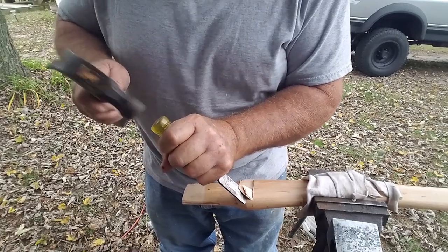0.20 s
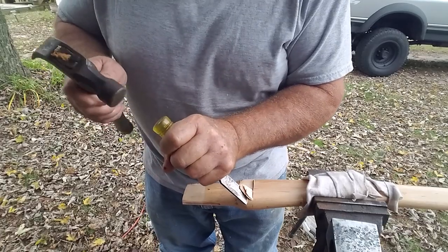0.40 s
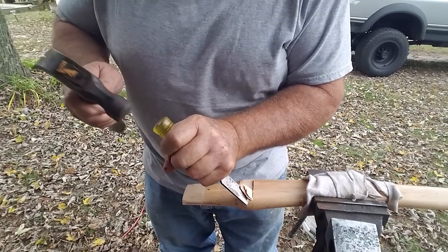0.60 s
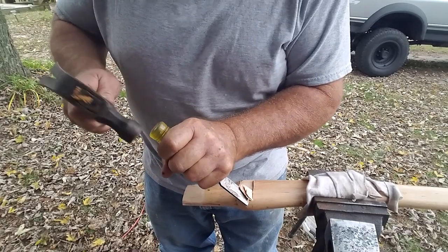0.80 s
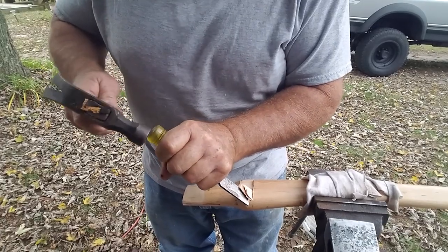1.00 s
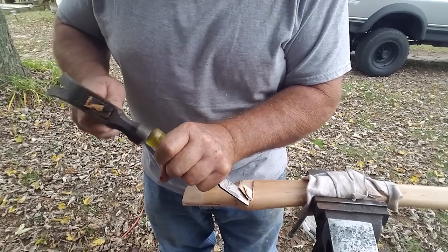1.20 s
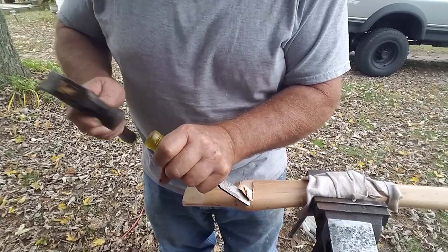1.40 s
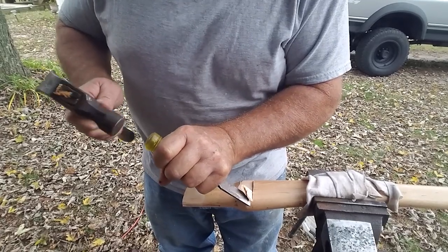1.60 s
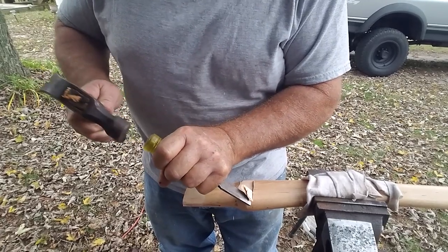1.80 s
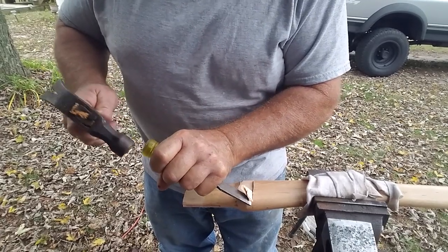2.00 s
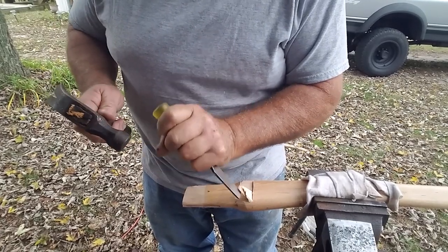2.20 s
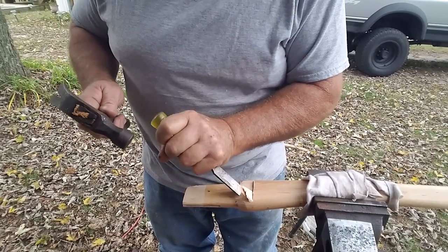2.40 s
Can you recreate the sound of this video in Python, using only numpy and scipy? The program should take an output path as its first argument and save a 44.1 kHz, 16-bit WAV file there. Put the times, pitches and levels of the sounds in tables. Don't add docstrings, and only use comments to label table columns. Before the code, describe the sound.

Hammer blows on a chisel in clamped wood, close and loud outdoors: eight sharp woody cracks from 0.22 to 1.87 seconds, roughly every 0.24. Each has a low thump, bench boom and brief steel ring, then about 0.03 later a loose vise clank with chatter. Small rattles settle between. One light chisel tap on wood at 2.32. Faint cricket chirps, quiet air and distant traffic rumble.

```python
import sys
import numpy as np
from scipy import signal
from scipy.fft import rfft, irfft, next_fast_len
from scipy.io import wavfile
from scipy.ndimage import map_coordinates

SR = 44100
rng = np.random.default_rng(int(sys.argv[2]) if len(sys.argv) > 2 else 0)


def gain_from_decibels(decibels):
    exponent = np.asarray(decibels, float) / 20
    return 10 ** exponent


def generate_wav(signal):
    frames = np.transpose(np.atleast_2d(signal))
    scaled = np.clip(frames, -1, 1) * 32767
    pcm = np.round(scaled).astype(np.int16)
    wavfile.write(sys.argv[1], SR, pcm)


N = 110250
PAD = 4410
T = np.arange(SR // 2) / SR

# start_s, peak_db, thump_db, thump_delay_s, boom_db
BLOWS = [
    (.22, -8.5, -10.5, .0135, -3.5),
    (0.4744, -7, -7.5, .012, 4.5),
    (0.7097, -5.5, -7, 0.011, 3.5),
    (0.9492, -7.5, -8, 0.01122, 0.5),
    (1.1994, -8.5, -8, .011, 0.5),
    (1.43, -8, -9.5, 0.01065, 1),
    (1.6588, -9, -12, .011, 2),
    (1.871, -8.5, -6.5, .012, 3),
]
# thump_hz, low_wood_db, knock_db, grain_db, steel_db
BLOW_COLOURS = [(275, -21.5, -11.5, -12.5, -37), (271.5, -19.5, -7, -16.5, -14), (247, -20, -3, -14.5, -28),
                (260, -25, -5, -13.5, -27.5), (260, -30, -6, -15.5, -16.5), (251.5, -20.5, -5, -13, -23),
                (270, -15, -5, -12, -17), (265.5, -16, -8, -11, -16)]
STEEL_LEVELS = [(-51, -56.5, -48, -63), (-41.5, -39.5, -70, -57), (-34, -33.5, -37, -41.5),
                (-47.5, -33, -35, -38.5), (-40, -41.5, -45, -69), (-37, -47, -37, -60.5),
                (-35, -48, -43, -67), (-30, -61, -48.5, -66)]
STEEL_HZ = [3491, 6850, 9003, 11350]
# t60_s, delay_s, attack_s
STEEL_ENVELOPES = [(0.38, 0.0085, 0.025), (0.11, .029, .002), (0.13, 0.0062, 0.0034), (0.16, 0.031, .002)]
# start_s, peak_db, clang_db, bright_db, wood_db
CLANKS = [
    (0.2452, -8.5, -18, -21.5, -10),
    (0.5029, -7, -12.5, -20, -9),
    (0.7413, -6.5, -15, -10.5, -8),
    (0.9777, -10, -14.5, -13.5, -10),
    (1.2259, -12.5, -17.5, -23, -13),
    (1.4566, -9, -17.5, -21, -15),
    (1.687, -9, -17, -21.5, -11),
    (1.899, -7.5, -14, -24, -13),
]
# start_s, peak_db, clang_db, bright_db, wood_db
EARLIER_CLANK = [
    (-.008, -11.5, -25, -29, -10),
]
# start_s, level_db
RATTLES = [
    (0.065, -39),
    (.575, -35),
    (0.819, -38),
    (1.063, -31),
    (1.523, -39),
    (1.75, -34),
    (1.965, -36.5),
]
# start_s, level_db, pitch_hz, hold_s
CHATTER = [(.245, -22.5, 2430, 0.013), (.262, -30.5, 2433, 0.011), (.5035, -14, 2406, 0.0087),
           (.511, -18, 2388, 0.027), (.526, -19, 2408, 0.0074), (.7415, -27, 2370, 0.0094),
           (.75, -18, 2388, .013), (.766, -14.5, 2443, 0.006), (.776, -25, 2436, 0.0056),
           (.979, -12.5, 2398, 0.027), (1.0, -28, 2390, 0.011), (1.0677, -41.5, 2395, 0.019),
           (1.2275, -16, 2425, 0.014), (1.4575, -19, 2417, .016), (1.681, -25, 2580, .004),
           (1.687, -17, 2400, 0.015), (1.8985, -14.5, 2444, 0.011), (1.912, -28.5, 2464, 0.0091),
           (-.01, -26, 2473, 0.023)]
# start_s, level_db
SNAPS = [(0.2444, -24), (0.252, -22.5), (0.502, -13), (0.7394, -13.5), (0.752, -14), (0.9785, -18),
         (0.985, -18), (1.2268, -21), (1.4588, -18.5), (1.6846, -15), (1.694, -21), (1.8997, -19),
         (1.905, -23)]
# start_s, level_db, pitch_hz, hold_s
SWINGS = [(0.245, -13.5, 285, 0.027), (0.501, -16.5, 240.5, 0.024), (0.514, -16, 260, 0.013),
          (0.739, -12.5, 270, 0.017), (.972, -24, 270, .008), (0.995, -20, 260, 0.01),
          (1.225, -13.5, 270, .012), (1.46, -14.5, 275, 0.015), (1.684, -12, 270, 0.0075),
          (1.902, -13.5, 280.7, 0.031), (1.074, -25.5, 290, 0.015)]
# start_s, crack_db, ring_db, thud_db, thud_tuning (ratio)
TAPS = [
    (2.3241, -31, -18.5, -24, 1.001),
]
# start_s, length_s, level_db, pitch_hz
CHIRPS = [
    (0.111, 0.026, -53.5, 4130),
    (.172, 0.028, -49, 4170),
    (0.642, .015, -57.5, 5640),
    (0.657, .02, -57, 5260),
    (0.871, 0.03, -56, 4180),
    (0.931, .015, -56.5, 4110),
    (1.709, .025, -48, 4190),
    (2.38, 0.018, -71.5, 3910),
    (2.432, 0.024, -52, 4170),
    (2.49, 0.013, -52.5, 4200),
]

# pitch_hz, density_db
CRACK = [(180, -38), (300, -3.5), (1040, -6), (2280, 8.5), (4850, -7), (6780, -7), (9180, -18),
         (13700, -17), (16500, -30)]
# pitch_hz, density_db
CLATTER = [(180, -16), (300, -9), (638, -12), (938, -15.5), (1230, -13), (5020, -35.5), (9020, -50),
           (15400, -59), (16500, -62)]
# pitch_hz, density_db
SCATTER = [(24, -42), (40, -19), (101, 2), (701, -24.5), (1540, -33), (3310, -38.5), (3550, -40.5),
           (3820, -38), (12000, -96), (15600, -56), (22000, -120)]

HANDLE = [(734.6, -14.5, 0.082), (895.7, -5.5, 0.082), (1510, -11.5, 0.032), (2540, -17, 0.015),
          (3863, 11, 0.0045), (5830, -5.5, 0.0088)]
# pitch_hz, level_db, t60_s
LOW_WOOD = [(456.5, 0.6, 0.097), (533.6, 0, 0.075)]
# pitch_hz, level_db, t60_s
GRAIN = [(1960, 5.6, 0.018), (1469, -9, 0.032), (3058, -9, .03)]
# pitch_hz, level_db, t60_s
KNOCK = [(1026.4, 1.5, .026)]
# pitch_hz, level_db, t60_s
TANG = [(14220, -35.5, .08), (15150, -36.5, .1)]
# pitch_hz, level_db, t60_s
BENCH = [(72.83, -29.5, 0.67), (105.9, -20, 0.35), (180.4, -21.5, 0.24), (281.5, -11.5, 0.12),
         (343.4, -15.5, 0.12)]
# pitch_hz, level_db, t60_s
CLANG = [(2635, -2.5, 0.051), (2717, -10, 0.046), (3140, -16, 0.11), (1617, -3, 0.03), (1492, -6, 0.063),
         (1249, -31, 0.0583), (1900, -17.5, 0.051), (1022, -8.5, 0.064)]
# pitch_hz, level_db, t60_s
BRIGHT_STEEL = [(6250, -34, 0.24), (8030, -23.5, 0.084), (9787, -32.5, 0.089), (12450, -43.5, .07)]
# pitch_hz, level_db, t60_s
SNAP = [(2870, 2.5, 0.014), (3930, -12, 0.011), (1584, -5, 0.026), (6330, -20.5, 0.011),
        (5500, -14.5, 0.023)]
# pitch_hz, level_db, t60_s
TAPPED = [(863, -12, 0.085), (1072, 9.5, 0.033), (1200, -21, 0.07), (1560, 4, 0.0153), (546, -0.5, .03),
          (2400, -13, 0.027), (2590, -4.5, 0.019), (2890, -5, 0.014), (3850, -8.5, 0.012)]
# pitch_hz, level_db, t60_s
THUD = [(183, -6, 0.18), (281.4, 6.5, 0.085), (312, 1, 0.19), (482, -4.5, 0.069), (750, -12.5, 0.12)]

# pitch_hz, density_db
YARD = [(22, -4.5), (110, 0), (400, -10.5), (1500, -25), (6300, -37), (6900, -39.5), (10000, -45),
        (13500, -38)]
# start_s, level_db
SWELL = [(0, 7), (.2, -7), (1.15, -6), (2.101, 2), (2.5, -1)]
# pitch_hz, width_hz, level_db
INSECTS = [(2736, 460, -71), (5860, 590, -73)]
# pitch_hz, likeness (0 to 1)
AIR_LIKENESS = [(60, .95), (300, .92), (1000, .4), (4000, .2)]
# pitch_hz, left_over_right_db
BALANCE = [(60, 2.4), (300, 2.6), (700, .5), (1400, 1.5), (2800, 2), (5600, -3), (14000, -9)]
# pitch_hz, left_lead_rad
LEFT_LEAD = [(250, 0), (700, .45), (1400, .7), (2800, 1.4), (9000, 1.6)]


def unit(x):
    return x / np.sqrt(np.mean(x ** 2) + 1e-20)


def along(points, hz):
    f, v = np.transpose(points)
    return np.interp(np.log(hz + 1), np.log(f + 1), v)


def filtered(x, response):
    m = next_fast_len(x.shape[-1] + 8192)
    spectrum = rfft(x, m) * response(np.fft.rfftfreq(m, 1 / SR))
    return irfft(spectrum, m)[..., :x.shape[-1]]


def hiss(spectrum, likeness, size):
    def split(hz):
        angle = np.arccos(np.clip(along(likeness, hz), -1, 1)) / 2
        return gain_from_decibels(along(spectrum, hz)) * [np.cos(angle), np.sin(angle)]

    shared, opposed = filtered(rng.standard_normal((2, size)), split)
    return unit(np.array([shared + opposed, shared - opposed]))


def wander(points, rate_hz, t=T):
    return map_coordinates(rng.standard_normal(points), [t * rate_hz])


def fade(t60_s, attack_s):
    return gain_from_decibels(-60 * T / t60_s) * (1 - np.exp(-T / attack_s))


def ring(modes, attack_s):
    hz, db, t60_s = np.transpose(modes)[:, :, None]
    luck = rng.standard_normal((3, len(modes), 1))
    level = gain_from_decibels(db + 1.5 * luck[0])
    phase = 2 * np.pi * hz * (1 + .005 * luck[1]) * T + .4 * luck[2]
    return (level * fade(t60_s, attack_s) * np.sin(phase)).sum(0)


def held(hz, hold_s, t60_s, attack_s):
    return fade(t60_s, attack_s) * np.sin(2 * np.pi * hz * T) / (1 + (T / hold_s) ** 3)


def burst(spectrum, treble_likeness, t60_s, attack_s, rough_db, rate_hz):
    lumps = wander(400, rate_hz)
    noise = hiss(spectrum, [(80, 1.0), (400, 0.71), (3000, treble_likeness)], size=len(T))
    return noise * fade(t60_s, attack_s) * gain_from_decibels(rough_db * lumps)


def silence():
    return np.zeros((2, PAD + N + SR))


def add(out, start_s, x):
    out[:, PAD + round(start_s * SR):][:, :len(T)] += x


def chatter():
    out = silence()
    for start_s, db, hz, hold_s in CHATTER:
        add(out, start_s, gain_from_decibels(db + 1.0) * held(hz, hold_s, 0.13, 0.0028))
    return out


def clanks():
    out = silence()
    for start_s, db, clang_db, bright_db, wood_db in list(CLANKS) + list(EARLIER_CLANK):
        add(out, start_s, gain_from_decibels(db - 9.5) * burst(CLATTER, 0.3, 0.079, 0.0002, 3.7, 433.5))
        add(out, start_s, gain_from_decibels(clang_db) * ring(CLANG, 0.0036))
        add(out, start_s, gain_from_decibels(bright_db) * ring(BRIGHT_STEEL, 0.0012))
        wood = ring(HANDLE[:3], 0.0025) + 0.24 * ring(LOW_WOOD, 0.0073)
        upper_bench = gain_from_decibels(2.0) * ring(BENCH[2:], 0.0044)
        add(out, start_s, gain_from_decibels(wood_db) * (wood + upper_bench))
    return out


def yard():
    t = np.arange(N) / SR
    air = gain_from_decibels(-50) * hiss(YARD, AIR_LIKENESS, size=N)
    rumble = filtered(air, lambda hz: 1 / (1 + (hz / 900) ** 2))
    swell_db = np.interp(t, *np.transpose(SWELL)) + 0.5 * wander(200, 6.86, t)
    out = air + rumble * (gain_from_decibels(swell_db) - 1)
    for hz, width_hz, db in INSECTS:
        band = [(hz - width_hz, -18), (hz, 0), (hz + width_hz * 0.29, -30), (20000, -90)]
        out = out + gain_from_decibels(db + 3.5 * wander(200, 25, t)) * hiss(band, [(100, 0.13)], size=N)
    return filtered(out, lambda hz: hz < 15800)


def rattles():
    out = silence()
    for start_s, db in RATTLES:
        rub = burst(CLATTER, 0.37, 0.07, 0.0105, 2.9, 225)
        add(out, start_s, gain_from_decibels(db) * (rub + 0.18 * ring(CLANG, 0.0043)))
    return out


def crickets():
    out = silence()
    pulse_s = .0165
    side_db = np.array([[5], [-.7]])
    strokes = np.abs(np.sin(np.pi * T / pulse_s / (1 + .3 * np.exp(-T / pulse_s)))) ** .7
    for start_s, length_s, db, hz in CHIRPS:
        tail = .3 * gain_from_decibels(-60 * (T - length_s) / 0.0812)
        shape = np.clip(T / 0.0028, 0, 1) * np.where(T < length_s, 1 - .5 * T / length_s, tail)
        waver = np.cumsum(wander(100, 120)) / SR
        tone = np.sin(2 * np.pi * hz * (T - 0.21 * T * T + .008 * waver))
        add(out, start_s, gain_from_decibels(db + side_db) * shape * strokes * tone)
    return out


def blows():
    out = silence()
    face = burst(CRACK, 0.31, 0.014, 0.003, 1.62, 430)
    for (start_s, db, thump_db, thump_delay_s, boom_db), colour in zip(BLOWS, BLOW_COLOURS):
        thump_hz, low_wood_db, knock_db, grain_db, steel_db = colour
        crack = gain_from_decibels(-5.0) * burst(CRACK, 0.52, 0.043, 0.00078, 2.4, 540)
        clatter = gain_from_decibels(-2.0) * burst(CLATTER, 0.26, 0.094, 0.0098, 1.1, 300)
        add(out, start_s - .0008, gain_from_decibels(db) * (gain_from_decibels(1.0) * face + crack + clatter))
        add(out, start_s, gain_from_decibels(db - 17) * burst(CRACK, 0.16, .1, .007, 4.4, 600))
        add(out, start_s, gain_from_decibels(db + 3.5) * ring(HANDLE, 0.0019))
        add(out, start_s, gain_from_decibels(low_wood_db) * ring(LOW_WOOD, 0.00307))
        add(out, start_s, gain_from_decibels(grain_db) * ring(GRAIN, 0.00086))
        add(out, start_s + .005, gain_from_decibels(steel_db) * held(2480, .01, 0.1, 0.0021))
        knock = gain_from_decibels(knock_db + 1.5) * ring(KNOCK, 0.00193)
        add(out, start_s + 0.001397, knock + gain_from_decibels(db) * ring(TANG, .003))
        add(out, start_s + thump_delay_s, -gain_from_decibels(thump_db + 10.0) * held(thump_hz, 0.0085, 0.098, 0.0031))
        add(out, start_s + 0.01609, gain_from_decibels(boom_db) * ring(BENCH, 0.0083))
        add(out, start_s, gain_from_decibels(db - 11.0) * burst(SCATTER, 0.253, 0.35, .02, 0.41, 90))
    return out


def steel_rings():
    out = silence()
    for blow, levels in zip(BLOWS, STEEL_LEVELS):
        for hz, db, (t60_s, delay_s, attack_s) in zip(STEEL_HZ, levels, STEEL_ENVELOPES):
            flutter_db = 2.1 * (hz > STEEL_HZ[0]) * wander(400, hz / 70)
            tone = fade(t60_s, attack_s) * np.sin(2 * np.pi * hz * T)
            add(out, blow[0] + delay_s, gain_from_decibels(db + flutter_db) * tone)
    return out


def snaps():
    out = silence()
    for start_s, db in SNAPS:
        add(out, start_s, gain_from_decibels(db) * ring(SNAP, .0003))
    return out


def swings():
    out = silence()
    for start_s, db, hz, hold_s in SWINGS:
        add(out, start_s, gain_from_decibels(db + 4.0) * held(hz, hold_s, 0.19, 0.0019))
    return out


def taps():
    out = silence()
    for start_s, crack_db, ring_db, thud_db, tuning in TAPS:
        crack = burst(CRACK, 0.8, 0.0078, 0.00066, 1.4, 300)
        clatter = .6 * burst(CLATTER, 0.55, 0.11, 0.0023, 2.9, 260)
        add(out, start_s, gain_from_decibels(crack_db) * (crack + clatter))
        add(out, start_s, gain_from_decibels(ring_db) * ring(TAPPED, 0.0021))
        tuned_thud = np.multiply(THUD, [tuning, 1, 1])
        add(out, start_s + .004, gain_from_decibels(thud_db) * ring(tuned_thud, 0.0027))
    return out


def scene():
    side = np.array([[.5], [-.5]])

    def ports(hz):
        return gain_from_decibels(side * along(BALANCE, hz)) * np.exp(1j * side * along(LEFT_LEAD, hz))

    vise = chatter() + clanks() + rattles() + snaps() + swings()
    work = filtered(vise + blows() + steel_rings() + taps(), ports)
    return (work + crickets())[:, PAD:PAD + N] + yard()


def top_cut(x):
    return signal.sosfilt(signal.butter(12, 16850, fs=SR, output="sos"), x)


def record(dry):
    limited = dry / (1 + np.abs(dry / 1.2) ** 4) ** (1 / 4)
    mix = filtered(limited, lambda hz: (hz < 16800) / np.sqrt(1 + (41.8 / (hz + 1)) ** 4))
    return top_cut(mix)


dry = scene()
out = record(dry)
generate_wav(out)
```